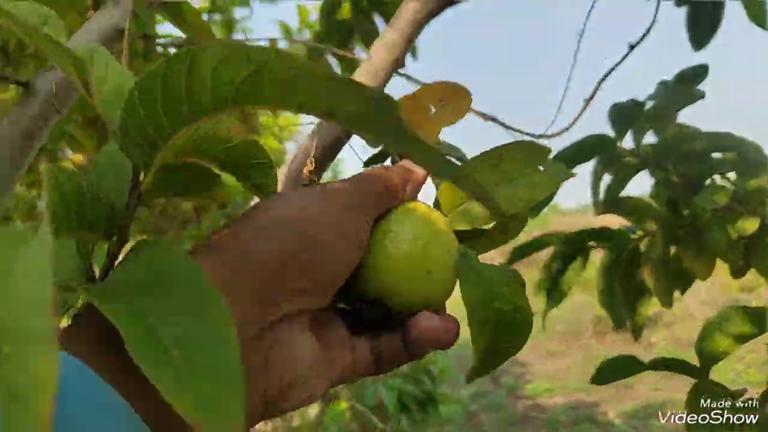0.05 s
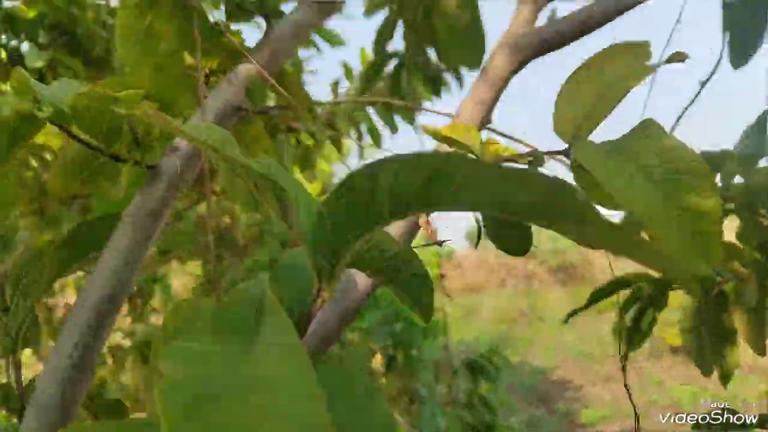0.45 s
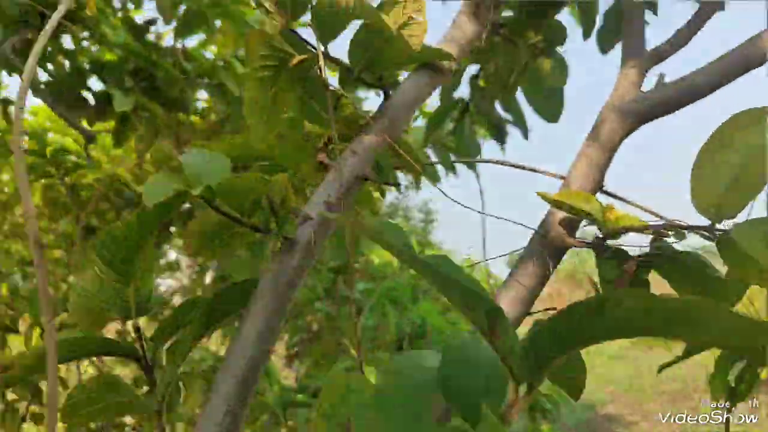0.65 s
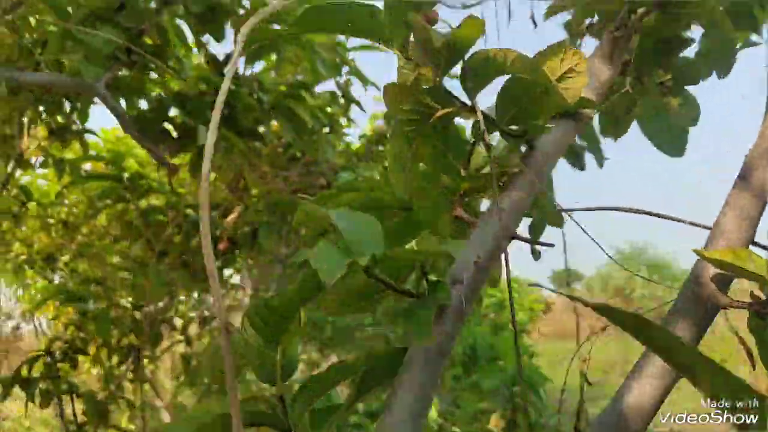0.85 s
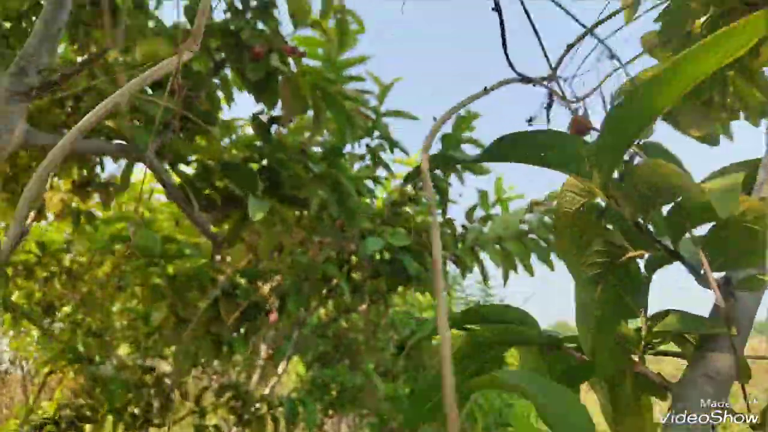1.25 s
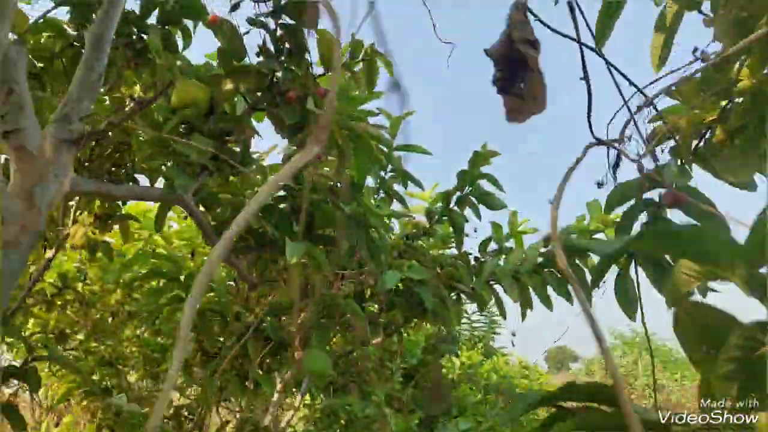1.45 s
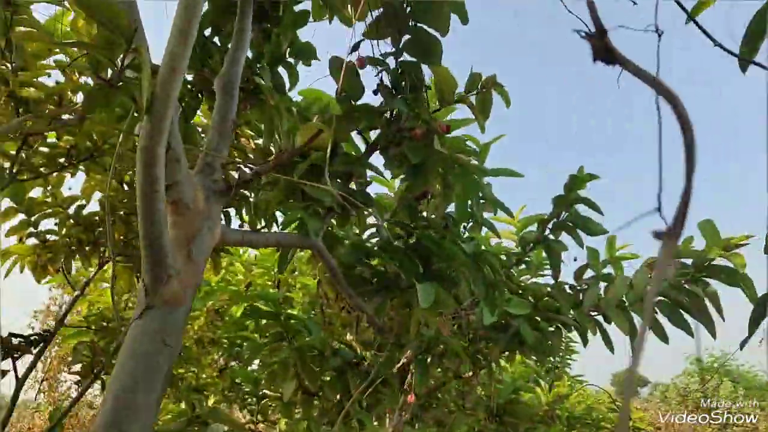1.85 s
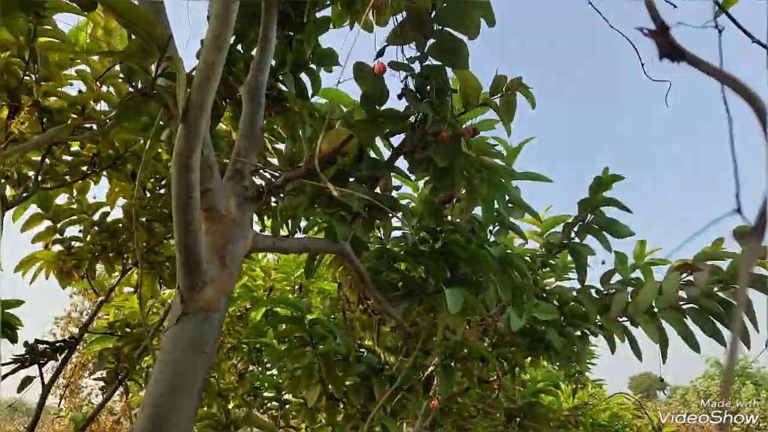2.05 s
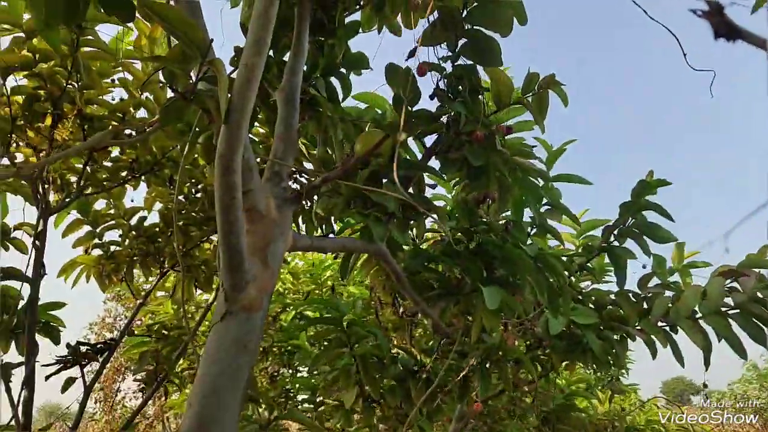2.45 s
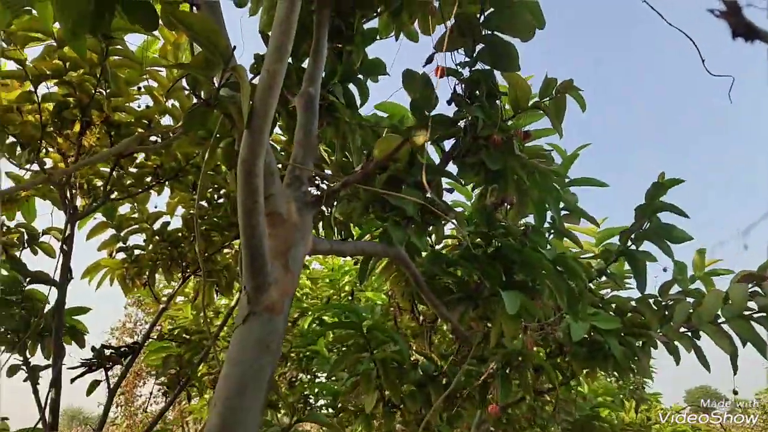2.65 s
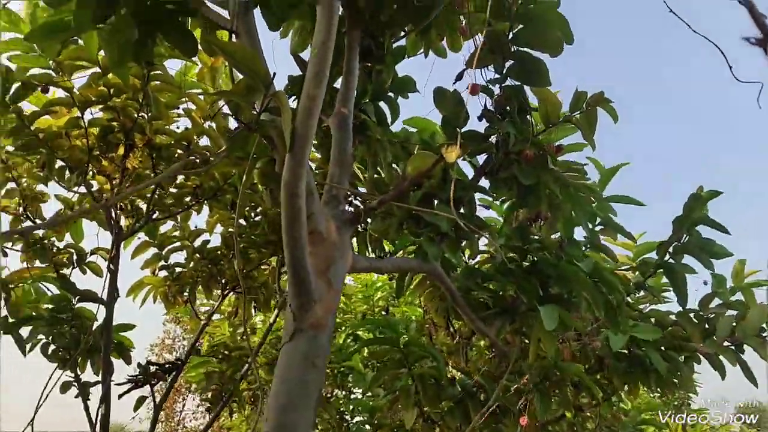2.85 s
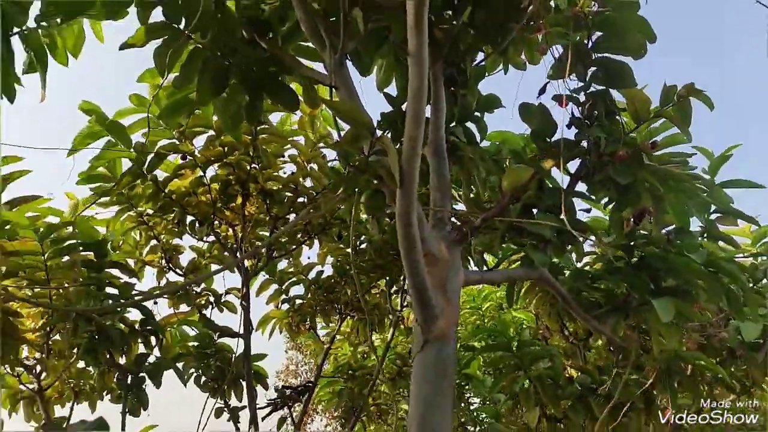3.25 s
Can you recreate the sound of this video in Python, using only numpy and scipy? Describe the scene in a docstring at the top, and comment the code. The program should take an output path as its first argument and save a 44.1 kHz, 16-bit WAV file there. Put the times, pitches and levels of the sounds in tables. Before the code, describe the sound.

Outdoors, a fruit is picked from a tree with one crisp, close snap. Foliage rustles and slaps against the moving microphone, a twig clicks sharply, and faint wind hisses in distant trees and buffets the microphone.

```python
"""Picking a fruit outdoors

Close by, a stalk snaps: the fracture excites damped modes of the wood, the last fibres tear and the
twig shivers. Leaves then rustle, slap and brush past the moving microphone, each sound a dense train
of tiny impulses, with a few dull knocks. A light breeze hisses in far trees and rumbles on the microphone."""
import sys
import numpy as np
from scipy import signal
from scipy.fft import rfft, irfft
from scipy.io import wavfile
from scipy.ndimage import map_coordinates

SR = 44100
rng = np.random.default_rng(int(sys.argv[2]) if len(sys.argv) > 2 else 0)


def waveform_to_disk(signal):
    """Save audio, clipped to [-1, 1], as 16-bit WAV at the path in sys.argv[1]."""
    frames = np.transpose(np.atleast_2d(signal))
    scaled = np.clip(frames, -1, 1) * 32767
    samples = np.round(scaled).astype(np.int16)
    wavfile.write(sys.argv[1], SR, samples)


N = 145530
TIME = np.arange(N) / SR
FREQS = np.maximum(np.arange(N // 2 + 1) * SR / N, 1)
CUTOFF_HZ = 15700
# balance of the two microphones: f/Hz, left minus right/dB
STEREO_BALANCE = [(100, 0.5), (380, 0), (1200, -0.5), (2200, -2.5), (3200, -5.5), (4500, -4.5), (6400, -11),
                  (8000, 0.5), (13000, -1), (15000, 1)]
# likeness of the two channels: f/Hz, coherence
STEREO_COHERENCE = [(220, 1), (400, 1), (700, 0.43), (1300, 0.029), (3000, 0.058), (6000, 0.031),
                    (6600, 0.77), (10000, 0.66), (15000, 0.91)]

# hiss of far trees: t/s, level/dB
TREE_LEVEL = [(0, -57.5), (0.13, -64), (0.4, -60), (0.65, -58.5), (3.3, -55)]
# its spectrum: f/Hz, relative level/dB
TREE_SPECTRUM = [(60, 14.5), (200, 1.5), (450, 4.5), (900, 2), (1600, 1.5), (3300, 5), (5000, 6),
                 (7400, -3), (8000, -19), (12500, -3.5), (16000, -45)]
# wind on the microphone: t/s, relative level/dB
WIND_LEVEL = [(0.0, -45), (0.04, -54.5), (0.93, -58), (1.24, -47.5), (1.31, -50.5), (1.93, -44.5),
              (2.06, -51), (2.52, -37), (2.63, -47), (2.73, -41.5), (2.96, -42), (3.02, -40), (3.09, -46),
              (3.3, -42.5)]
# its spectrum: f/Hz, relative level/dB
WIND_SPECTRUM = [(12, -19.5), (25, -3), (40, 1), (58, -2.5), (90, -2), (125, -15), (180, -25.5),
                 (300, -32.5), (1000, -44), (16000, -100)]
WIND_GAIN_DB, WIND_LUMPS_DB, WIND_LUMPS_HZ = -2, 2.5, 8.9
# single eddies: t/s, peak level/dB, period/s
EDDIES = [(1.223, -38.5, 0.027), (1.705, -31.5, 0.023), (1.893, -36.5, 0.033), (2.344, -31, 0.029),
          (2.458, -32.5, 0.027), (2.53, -36.5, 0.035), (2.741, -37.5, 0.038), (2.808, -33.5, 0.018),
          (2.849, -33, 0.02), (3.021, -28, 0.028)]

# dull knocks of wood: t/s, impulse level/dB, f/Hz, t60/s
WOOD_KNOCKS = [(0.511, -47.5, 1750, 0.038), (0.512, -49, 584, 0.019), (0.870, -46.5, 1995, 0.048),
               (1.29, -42.5, 666, 0.013), (1.783, -53, 700, 0.012), (1.8609, -20, 710, 0.0076),
               (2.378, -37.5, 231, 0.067), (2.38, -35, 2950, 0.032)]
# stirring of the foliage: t/s, relative level/dB
RUSTLE_LEVEL = [(0, -59.5), (0.05, -56), (0.12, -65), (0.3, -60), (0.5, -65.5), (0.63, -60), (0.74, -64.5),
                (1.0, -62), (1.3, -50), (1.40, -52.5), (1.55, -47.5), (1.66, -45), (1.79, -43.5),
                (1.87, -42.5), (1.92, -49), (2.09, -46.5), (2.19, -51), (2.3, -47.5), (2.36, -52),
                (2.48, -48), (2.60, -52), (2.67, -52.5), (2.9, -54), (3.0, -61.5), (3.12, -58.5),
                (3.3, -62.5)]
# its spectrum: f/Hz, relative level/dB
RUSTLE_SPECTRUM = [(100, -27), (400, -11.5), (1000, -12.5), (1400, -12.5), (2100, -5.5), (2600, -7.5),
                   (3300, -1.5), (4700, -6.5), (5700, 0), (6800, 2), (7550, -2), (8000, -12.5),
                   (10500, -13.5), (12800, -10.5), (16000, -23.5)]
RUSTLE_GRAINS_PER_S, RUSTLE_SPREAD_DB, RUSTLE_FLUTTER_DB, RUSTLE_GAIN_DB = 8000, 2, 1, 1.5
CRACKLES_PER_S, CRACKLE_T60_S, CRACKLE_DB = 68, 0.038, -7.5
PATCH_WIDTH_HZ, PATCHES_PER_S, PATCH_DEPTH_DB = 327.7, 26, 3
# a leaf drags after its slap: t/s, level/dB, attack/s, t60/s
LEAF_DRAGS = [(2.398, -40, .006, 0.12), (2.478, -46.5, 0.032, 0.17)]
SCRAPE_HZ, SCRAPE_WIDTH_HZ = 4300, 550
# leaves flick or slap: t/s, attack/s, t60/s, edge level/dB, body level/dB, sparkle level/dB
LEAF_IMPACTS = [(0.046, 0.0087, 0.12, -43, -60, -53.5), (0.2098, 0.0005, 0.013, -52, -51, -51),
                (0.256, .004, 0.35, -42, -61, -49.5), (0.808, 0.0023, 0.044, -50, -73, -61),
                (0.87, 0.0022, 0.092, -45, -51, -57.5), (1.124, 0.0087, 0.045, -46.5, -53.5, -64),
                (1.209, 0.014, 0.19, -54, -40.5, -63), (1.281, .002, 0.066, -42.5, -56, -60),
                (1.438, .002, 0.078, -44, -72, -56), (1.495, .002, 0.11, -42.5, -53, -55),
                (1.588, 0.0022, 0.062, -39.5, -62, -69), (1.63, .001, 0.051, -39, -61, -57),
                (1.7, 0.0095, 0.13, -38, -60, -42.5), (1.7085, 0.00065, 0.03, -32.5, -62, -29),
                (1.715, 0.0022, 0.023, -23.5, -53, -38.5), (1.723, 0.002, 0.087, -28, -61, -48),
                (1.735, .001, 0.16, -36, -70, -46), (1.823, .001, .04, -38.5, -60, -58),
                (1.866, 0.00083, 0.036, -36, -42, -62), (1.936, .0003, 0.052, -39, -50, -43),
                (2.056, 0.001, 0.044, -42, -63, -46), (2.117, 0.001, 0.074, -37, -56, -42.5),
                (2.244, 0.0033, 0.044, -48, -49, -50.5), (2.311, .001, 0.044, -43, -65, -47),
                (2.376, 0.00089, 0.17, -37, -39, -60), (2.532, 0.0062, 0.079, -35, -60, -41.5),
                (2.641, .001, 0.054, -46.5, -69, -54), (2.68, 0.002, 0.083, -45, -54, -57),
                (2.726, .001, .03, -44, -60, -63), (2.757, 0.0018, 0.019, -60, -46, -62),
                (2.788, 0.0074, 0.099, -47, -77, -54), (2.865, 0.0018, 0.073, -49, -53, -53),
                (2.930, 0.0022, 0.098, -43, -55, -53), (3.101, 0.0034, .07, -49, -57, -58),
                (3.243, 0.0075, 0.14, -47, -72, -77)]
# crisp edge of a leaf: f/Hz, relative level/dB
EDGE_SPECTRUM = [(300, -31), (1500, -12.5), (3200, -1), (4700, 0.5), (6900, 5), (7600, -3.5), (8100, -13),
                 (16000, -32)]
# its low body: f/Hz, relative level/dB
BODY_SPECTRUM = [(100, -81), (220, -4), (320, -39), (480, 10), (680, -3.5), (950, 3.5), (1400, 1),
                 (1800, 3), (3100, 3.5), (5000, 0), (16000, -22)]
# its fine sparkle: f/Hz, relative level/dB
SPARKLE_SPECTRUM = [(300, -17), (6000, -50), (8600, -0.5), (10000, 5.5), (12000, 7.5), (14000, 1.5),
                    (16000, -9)]
LEAF_GRAINS_PER_S, LEAF_SPREAD_DB, LEAF_PAN_DB = 11000, 4.5, 2

# blows on a twig: t/s, impulse level/dB
TWIG_BLOWS = [(1.7088, -11.5), (1.7245, -30), (1.7368, -30), (1.783, -30.5), (1.8614, -34.5), (2.379, -24)]
# modes of that twig: f/Hz, gain/dB, t60/s, left minus right/dB
TWIG_RESONANCES = [(361, -17.5, 0.034, 1), (1016, -15.5, 0.021, 0), (1440, -22.5, 0.012, -7),
                   (2176, -7, 0.0083, 2), (3290, -6, 0.014, -28)]
# fibres tear around each break: t/s, level/dB, attack/s, t60/s
FIBRE_TEARS = [(0.2377, -28, 0.00043, 0.099), (0.25, -24.5, 0.0009, 0.024)]
# their spectrum: f/Hz, relative level/dB
TEAR_SPECTRUM = [(100, -43), (170, -7), (270, -6), (420, -21), (650, -4), (950, 3.5), (1400, -5.5),
                 (3400, 7), (5200, -2), (7300, 3), (8600, -10), (12000, -2), (16000, -23)]
# their likeness in the two channels: f/Hz, coherence
TEAR_COHERENCE = [(400, 1), (1300, 0.9), (3000, .15), (12000, 0.22)]
TEAR_GRAINS_PER_S, TEAR_SPREAD_DB, TEAR_PAN_DB = 12000, 2.5, -2.5
# the stalk breaks: t/s, impulse level/dB
STALK_CRACKS = [(0.2363, -9), (0.2387, -20), (0.2505, -20.5), (0.2519, -30)]
# modes of the stalk and its twig: f/Hz, gain/dB, t60/s, left minus right/dB
STALK_RESONANCES = [(420, -28.5, 0.061, 2), (970, -17.5, 0.038, 1), (1200, -15.5, 0.013, 0),
                    (1565, -16, 0.011, 11), (2010, -21, 0.0088, 13), (2430, -17, 0.0039, -9),
                    (2930, 4, 0.0069, -10.5), (3720, -7, 0.0086, -17), (4650, -13.5, 0.018, 3),
                    (7300, -30, .016, -1)]


def from_db(db):
    """Amplitude ratio of a level in decibels."""
    return 10 ** (np.asarray(db) / 20)


def unit_rms(x):
    """Normalisation to unit mean power."""
    return x / np.sqrt(np.mean(x ** 2) + 1e-20)


def over_time(points):
    """Linear interpolation over time."""
    return np.interp(TIME, *np.transpose(points))


def over_hz(points):
    """Linear interpolation over log frequency."""
    hz, value = np.transpose(points)
    return np.interp(np.log(FREQS), np.log(hz), value)


def pan(db):
    """Constant-power panning: two gains with the given level difference."""
    half_db = np.atleast_1d(db) / 2
    gains = np.array([from_db(half_db), from_db(-half_db)])
    return gains / np.sqrt(np.mean(gains ** 2, axis=0))


def drift(corner_hz):
    """Low-passed noise gives a slow fluctuation of unit power."""
    return unit_rms(irfft(rfft(rng.standard_normal(N)) / (1 + (FREQS / corner_hz) ** 2), N))


def grains(per_s, spread_db):
    """Shot noise: two independent streams of tiny clicks of uneven size."""
    sizes = from_db(spread_db * np.minimum(rng.exponential(1, (2, N)), 4))
    signs = rng.choice([-1, 1], (2, N))
    occurs = rng.random((2, N)) < per_s / SR
    return unit_rms(sizes * signs * occurs)


def colour(x, spectrum):
    """Minimum-phase filter of unit power gain, made causal by folding the cepstrum."""
    magnitude = unit_rms(from_db(over_hz(spectrum)))
    cepstrum = irfft(np.log(magnitude), N)
    cepstrum[1:N // 2] *= 2
    cepstrum[N // 2 + 1:] = 0
    return irfft(rfft(x) * np.exp(rfft(cepstrum)), N)


def stereo(pair, coherence=STEREO_COHERENCE):
    """Mid-side mixing makes two independent streams partly coherent, most of all in the bass."""
    mid, side = rfft(pair)
    alike = np.clip(over_hz(coherence), 0, 1)
    mid, side = mid * np.sqrt((1 + alike) / 2), side * np.sqrt((1 - alike) / 2)
    return irfft(np.array([mid + side, mid - side]) * pan(over_hz(STEREO_BALANCE)), N)


def burst(peak_s, db, attack, t60):
    """Exponential rise to a peak, then exponential decay."""
    age = TIME - peak_s
    return from_db(db - 60 * np.maximum(age, 0) / t60) * np.exp(np.minimum(age, 0) / attack)


def impulses(rows):
    """Ideal impacts: one impulse for each row of t/s, level/dB."""
    out = np.zeros(N)
    for s, db in rows:
        out[int(s * SR)] += from_db(db)
    return out


def ring(x, hz, t60):
    """Damped oscillator: a unit impulse starts a decaying sine of unit amplitude."""
    radius, angle = np.exp(-np.log(1000) / (t60 * SR)), 2 * np.pi * hz / SR
    return signal.lfilter([0, np.sin(angle)], [1, -2 * radius * np.cos(angle), radius ** 2], x + 1e-18)


def breeze():
    """Turbulence rumbles alike on both microphones; far trees hiss as broadband noise."""
    gusts = from_db(WIND_GAIN_DB + over_time(WIND_LEVEL) + WIND_LUMPS_DB * drift(WIND_LUMPS_HZ))
    rumble = unit_rms(colour(rng.standard_normal(N), WIND_SPECTRUM))
    hiss = stereo(colour(rng.standard_normal((2, N)), TREE_SPECTRUM))
    return gusts * rumble + from_db(over_time(TREE_LEVEL)) * hiss


def buffets():
    """Each eddy is a bipolar pressure pulse, one slow push and pull on both microphones."""
    out = 0
    for s, db, period in EDDIES:
        phase = 2 * np.pi * (TIME - s) / period
        out = out - from_db(db) * phase * np.exp((1 - phase ** 2) / 2)
    return out


def knocks():
    """A soft contact is a band-limited force that excites one damped mode of the wood."""
    out = 0
    for s, db, hz, t60 in WOOD_KNOCKS:
        band = signal.butter(2, [hz * 0.57, hz / 0.64], "band", fs=SR)
        force = signal.lfilter(*band, impulses([(s, db)]) + 1e-18)
        out = out + ring(force, hz, t60)
    return out


def shifting_bands(x):
    """Random modulation: each narrow band swells and fades as different leaves take turns."""
    hz, s, cells = signal.stft(x, SR, nperseg=512)
    patches = rng.standard_normal((200, 200))
    positions = np.meshgrid(hz / PATCH_WIDTH_HZ, s * PATCHES_PER_S, indexing="ij")
    gain_db = PATCH_DEPTH_DB * map_coordinates(patches, positions, order=3, mode="mirror")
    return signal.istft(cells * from_db(gain_db), SR)[1][:, :N]


def rustle():
    """Friction between leaves gives shot noise; flutter and single-leaf crackles add in power."""
    onsets = (rng.random(N) < CRACKLES_PER_S / SR) * rng.random(N)
    decay = np.exp(-np.log(1000) / (CRACKLE_T60_S * SR))
    crackles = from_db(CRACKLE_DB) * unit_rms(signal.lfilter([1], [1, -decay], onsets + 1e-18))
    flutter = from_db(RUSTLE_FLUTTER_DB * drift(corner_hz=26))
    envelope = from_db(RUSTLE_GAIN_DB + over_time(RUSTLE_LEVEL)) * np.hypot(flutter, crackles)
    friction = envelope * grains(RUSTLE_GRAINS_PER_S, RUSTLE_SPREAD_DB)
    return stereo(shifting_bands(colour(friction, RUSTLE_SPECTRUM)))


def leaf_scrapes():
    """Stick-slip friction of a sliding leaf drives one broad resonance."""
    slips = grains(LEAF_GRAINS_PER_S, LEAF_SPREAD_DB)
    resonance = signal.iirpeak(SCRAPE_HZ, SCRAPE_HZ / SCRAPE_WIDTH_HZ, SR)
    buzz = unit_rms(signal.lfilter(*resonance, slips))
    return stereo(buzz * sum(burst(*row) for row in LEAF_DRAGS))


def leaf_slaps():
    """Each impact is a decaying burst of shot noise in three spectra: edge, body and sparkle."""
    out = 0
    for part, spectrum in enumerate((EDGE_SPECTRUM, BODY_SPECTRUM, SPARKLE_SPECTRUM)):
        envelope = sum(burst(s, levels[part], attack, t60) for s, attack, t60, *levels in LEAF_IMPACTS)
        out = out + colour(envelope * grains(LEAF_GRAINS_PER_S, LEAF_SPREAD_DB), spectrum)
    return pan(LEAF_PAN_DB) * stereo(out)


def struck_wood(hits, modes):
    """Modal superposition: blows ring damped modes, and thin wood radiates little below each."""
    blows, out = impulses(hits), 0
    for k, (hz, db, t60, pan_db) in enumerate(modes):
        drive = signal.lfilter(*signal.butter(1, hz / 2, "high", fs=SR), blows + 1e-18)
        out = out + (-1) ** k * from_db(db) * pan(pan_db) * ring(drive, hz, t60)
    return out


def stalk_snap():
    """Fracture excites the wood impulsively; tearing fibres add bursts of shot noise."""
    fibres = grains(TEAR_GRAINS_PER_S, TEAR_SPREAD_DB) * sum(burst(*row) for row in FIBRE_TEARS)
    tearing = pan(TEAR_PAN_DB) * stereo(colour(fibres, TEAR_SPECTRUM), TEAR_COHERENCE)
    return struck_wood(STALK_CRACKS, STALK_RESONANCES) + tearing


def scene():
    """Superposition in a free field: the sources add without echo."""
    foreground = stalk_snap() + leaf_slaps() + leaf_scrapes() + struck_wood(TWIG_BLOWS, TWIG_RESONANCES)
    return foreground + rustle() + knocks() + breeze() + buffets()


def record(dry):
    """Band limiting: an elliptic low-pass filter cuts the highest treble steeply."""
    return signal.sosfilt(signal.ellip(10, .2, 80, CUTOFF_HZ, fs=SR, output="sos"), dry)


dry = scene()
out = record(dry)
waveform_to_disk(out)
```